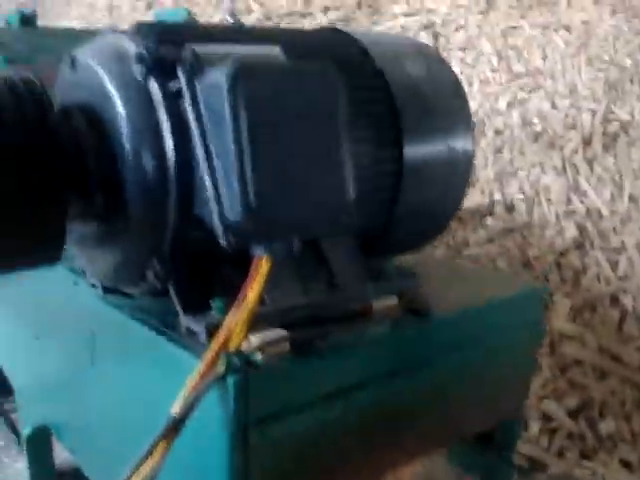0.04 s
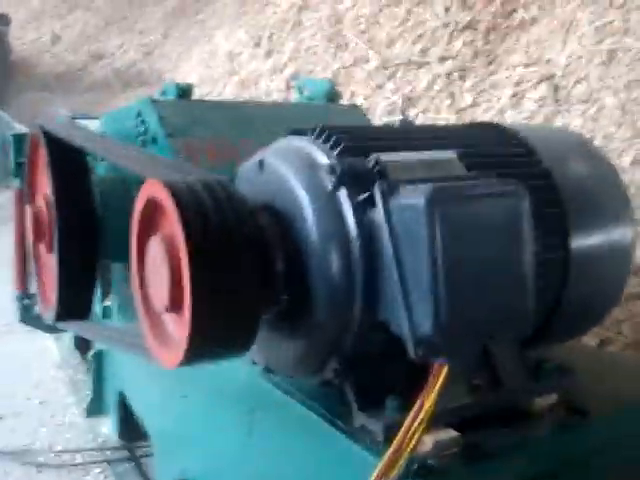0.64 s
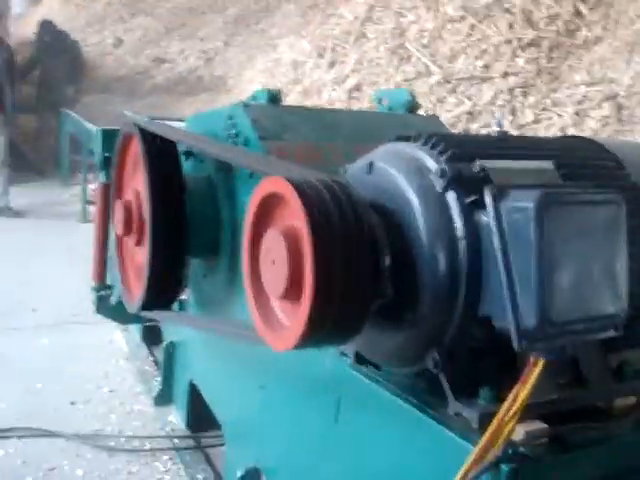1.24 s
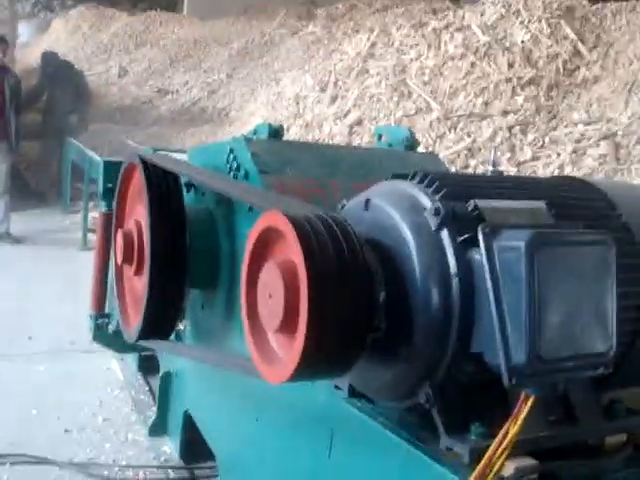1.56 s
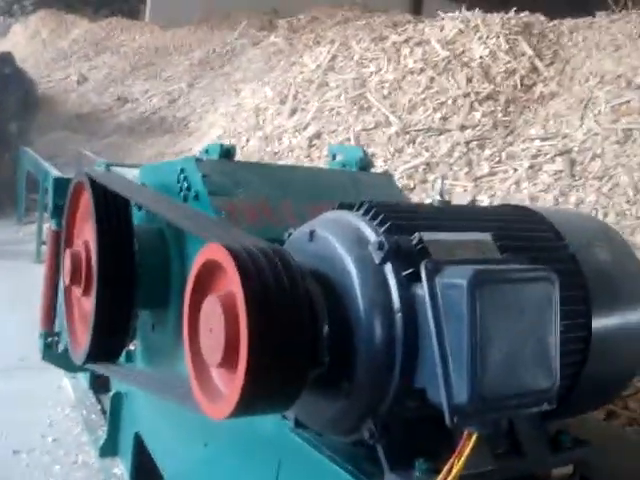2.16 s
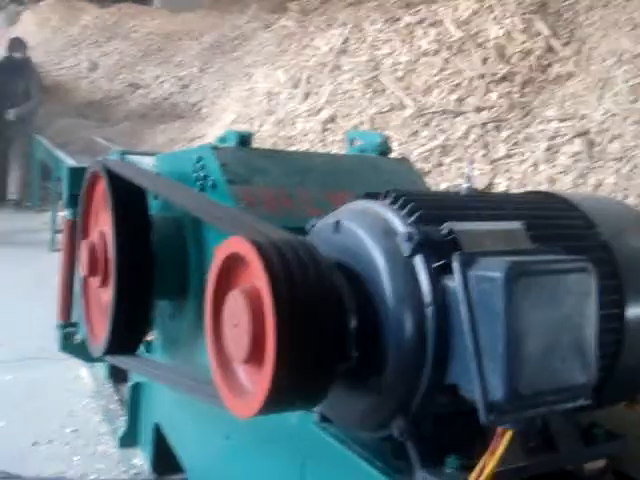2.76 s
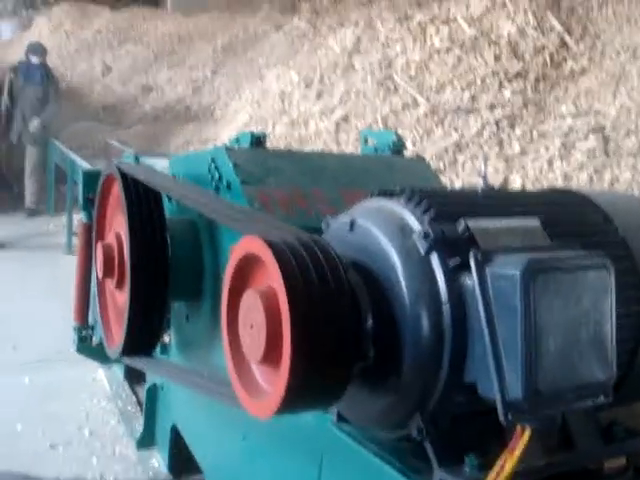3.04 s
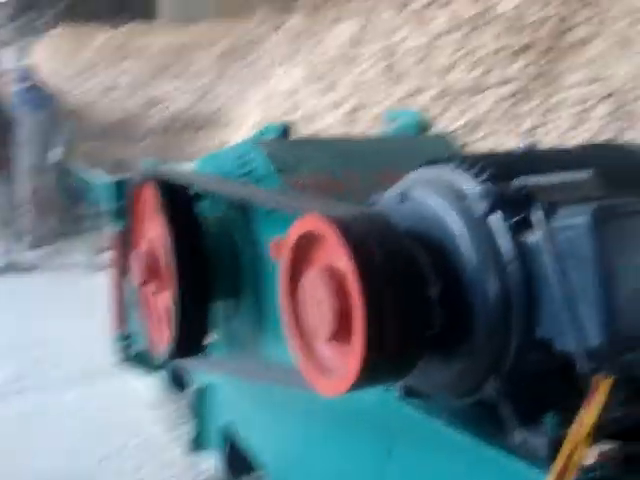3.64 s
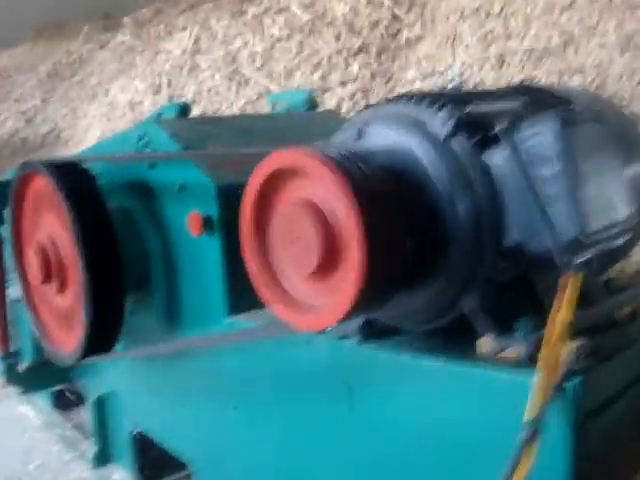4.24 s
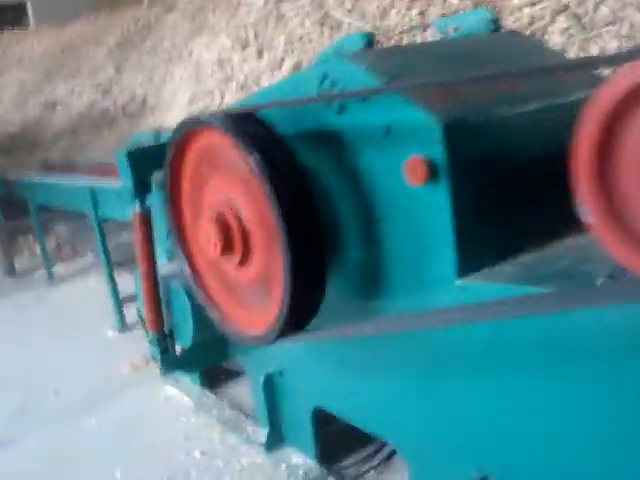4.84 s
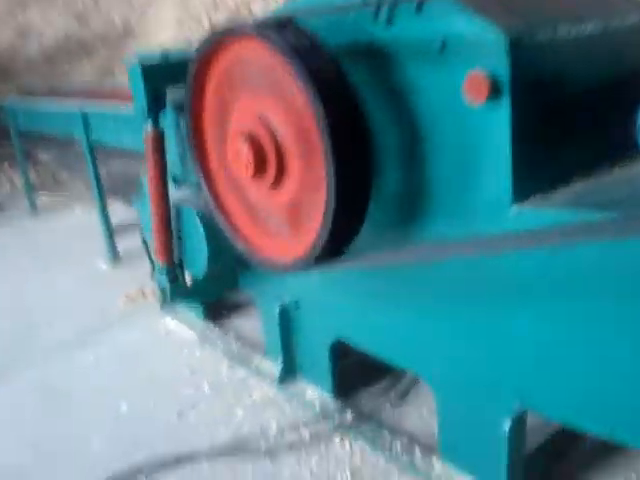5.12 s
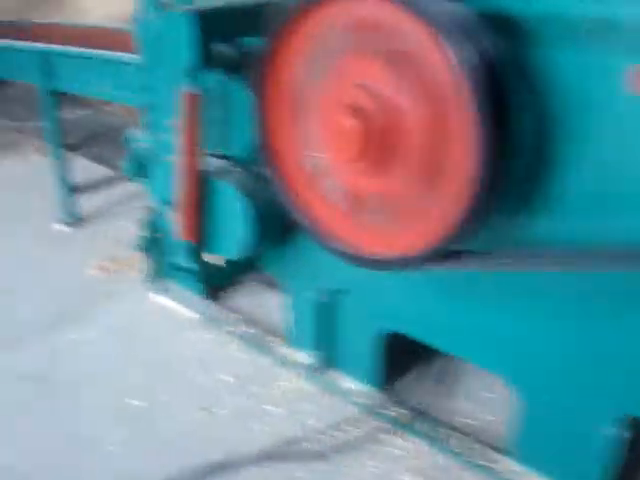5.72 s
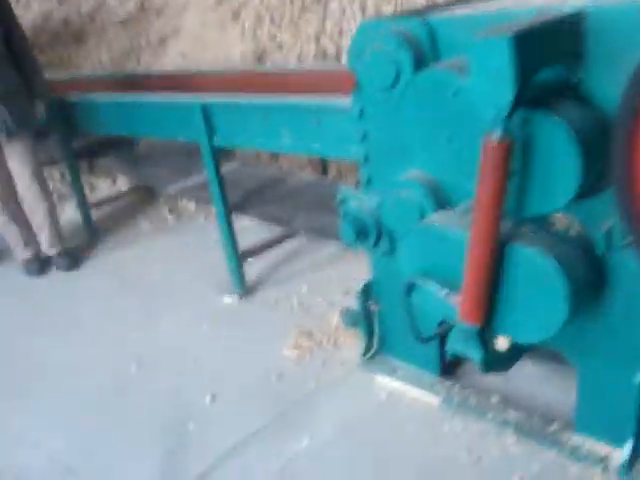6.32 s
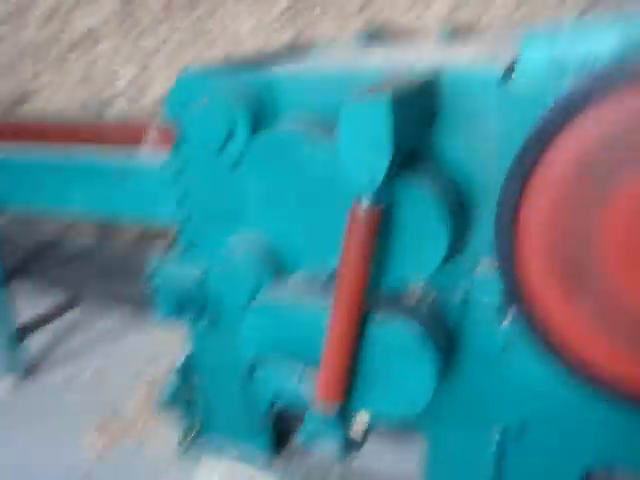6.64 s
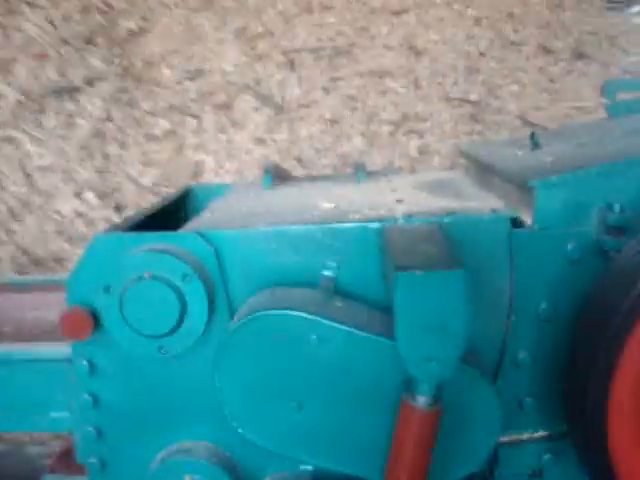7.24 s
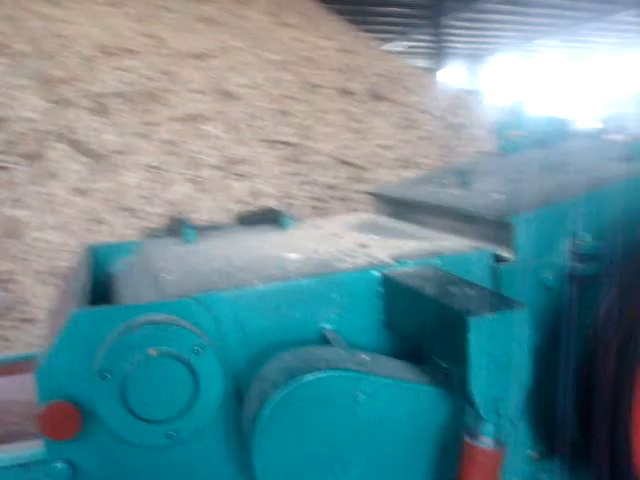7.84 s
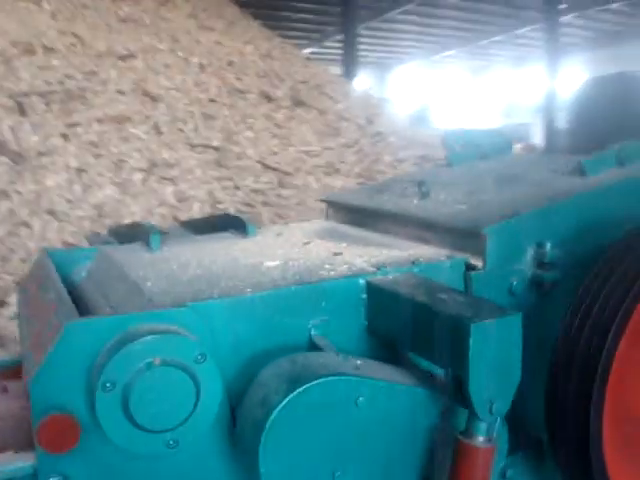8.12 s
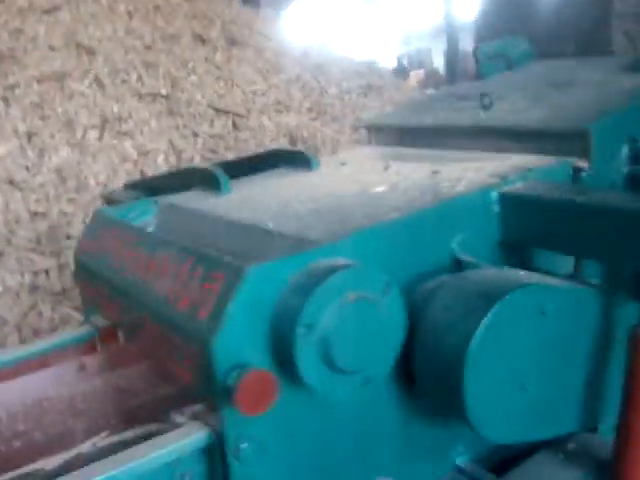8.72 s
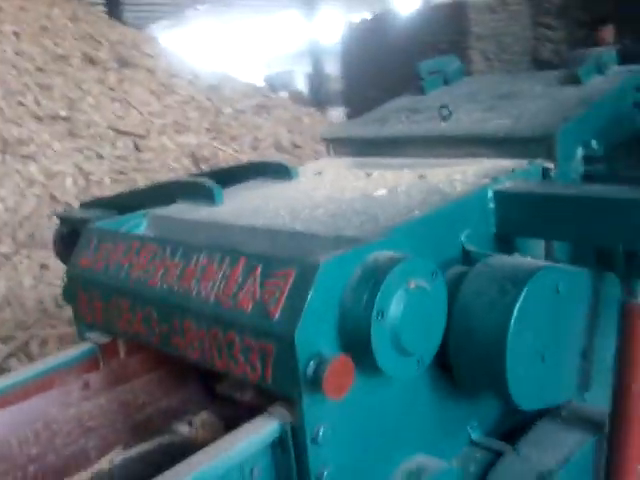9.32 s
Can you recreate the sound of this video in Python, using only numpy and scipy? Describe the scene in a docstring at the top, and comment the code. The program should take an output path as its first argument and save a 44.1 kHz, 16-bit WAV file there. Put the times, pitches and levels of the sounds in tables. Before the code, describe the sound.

A large wood chipper roars steadily, shredding wood over a low drone, a thin motor whine and hissing chips.

```python
"""A belt-driven drum chipper runs in a yard: knives shred wood, chips rattle through the steel housing,
the drum drones on the orders of its knife beat, the belts hiss and tough pieces flare up in the roar.
The listener reaches the whining electric motor by 2 s, then passes the side plate as the housing
gradually hides the flying chips. The feed slackens at 4.6 s, the housing knocks at 5.3 s, and the feed
slackens again at 6.2 s. From 8 s the drone swells in front of the open feed mouth."""
import sys
import numpy as np
from scipy import signal
from scipy.fft import rfft, irfft, next_fast_len
from scipy.io import wavfile
from scipy.ndimage import uniform_filter1d, map_coordinates

SR = 44100
rng = np.random.default_rng(int(sys.argv[2]) if len(sys.argv) > 2 else 0)


def wav_out(sig):
    """Save sig, one row per channel (or a flat mono array), as 16-bit PCM at SR to the path in sys.argv[1]."""
    wavfile.write(sys.argv[1], SR, np.round(np.clip(np.atleast_2d(sig).T, -1, 1) * 32767).astype(np.int16))


N = 422478
TIME_S = np.arange(N) / SR


def amp(db):
    """Decibels to gain."""
    return 10 ** (np.asarray(db) / 20)


def unit(x):
    """Scale to rms 1."""
    return x / np.sqrt(np.mean(x ** 2) + 1e-20)


def curve(rows):
    """(time, value) rows to one value per sample."""
    return np.interp(TIME_S, *np.transpose(rows))


def wobble(knots_per_s):
    """Smooth random curve, rms near 1."""
    coarse = np.arange(0, N + 64, 64)
    knots = rng.standard_normal(2048)
    spline = map_coordinates(knots, [coarse * knots_per_s / SR], mode="wrap")
    return np.interp(np.arange(N), coarse, spline)


def filtered(x, response):
    """Zero-phase filter with gain response(hz)."""
    size = next_fast_len(N + 8192)
    return irfft(rfft(x, size) * response(np.fft.rfftfreq(size, 1 / SR)), size)[:N]


def coloured(x, spectrum):
    """x through (frequency, level) rows, at rms 1."""
    points_hz, db = np.transpose(spectrum)
    return unit(filtered(x, lambda hz: amp(np.interp(np.log(hz + 1), np.log(points_hz), db))))


def resonance(centre_hz, half_width_hz):
    """Narrow noise band at rms 1."""
    noise = rng.standard_normal(N)
    return unit(filtered(noise, lambda hz: 1 / (1 + ((hz - centre_hz) / half_width_hz) ** 2)))


def patchy(x, depth_db):
    """Changing pieces of wood briefly favour changing bands."""
    spectra = signal.stft(x, nperseg=512)[2]
    across_bands = uniform_filter1d(rng.standard_normal(spectra.shape), size=9, axis=0)
    patches = unit(uniform_filter1d(across_bands, size=10, axis=1))
    return signal.istft(spectra * amp(depth_db * patches), nperseg=512)[1][:N]


def impacts(per_s, scatter_db, blur):
    """Hail of tiny uneven impacts; the housing smears the power share blur into noise."""
    clicks = (rng.random(N) < per_s / SR) * rng.choice([-1, 1], N)
    hits = clicks * amp(scatter_db * rng.uniform(-0.57, 1, N))
    return np.sqrt(1 - blur) * unit(hits) + np.sqrt(blur) * rng.standard_normal(N)


def strokes(beats, depth, fall_beats, uneven_db=6, stray_beats=0.12):
    """Envelope: each knife cuts a little early or late, with a burst of its own strength."""
    cuts = np.abs(beats + stray_beats * wobble(30))
    force = amp(uneven_db * (2 * rng.random(1024) - 1))[cuts.astype(int)]
    return unit(1 + depth * force * np.exp(-(cuts % 1) / fall_beats))


# Belt hiss spectrum: (frequency [Hz], relative density [dB])
BELT_SPECTRUM = [(3000, -40), (5500, -11), (7500, -0.5), (9000, 2.5), (10200, -7.5)]


def belts(level_db=-35):
    """Drive belts hiss evenly over their pulleys."""
    return amp(level_db + 0.4 * wobble(9)) * coloured(rng.standard_normal(N), BELT_SPECTRUM)


# Motor whine envelope: (time [s], relative level [dB])
WHINE_LEVELS = [(0, -26.5), (1.2, -31.5), (3, -31.5), (4, -35), (4.7, -41), (5.6, -32), (7, -37),
                (9.58, -32.5)]


def motor_whine(pitch_hz=1636, half_width_hz=20, gain_db=-2.5):
    """The motor sings in one narrow, fuzzy band."""
    return amp(curve(WHINE_LEVELS) + gain_db) * resonance(pitch_hz, half_width_hz)


# Steel housing modes: (frequency [Hz], half width [Hz], relative level [dB])
HOUSING_MODES = [(1065, 22, -4.5), (1132, 17, 1), (1256, 19, 1.5), (1456, 12, 1.5), (1936, 30, 1),
                 (2350, 32, -8), (2474, 77, -7), (3080, 44, -3.5), (3500, 19, -11.5), (4335, 20, 0.5)]


def housing_ring(shred_db, relative_db=-11, uneven_db=2.5):
    """Chips hit the plates here and there; each mode rings up and fades independently."""
    ring = np.zeros(N)
    for mode_hz, half_width_hz, db in HOUSING_MODES:
        ring += resonance(mode_hz, half_width_hz) * amp(db + uneven_db * wobble(6))
    return amp(shred_db + relative_db) * unit(ring)


# Housing knocks: (time [s], decay start level [dB], pitch [Hz], t60 [s])
HOUSING_KNOCKS = [(5.228, -29, 133, .06), (5.273, -19, 243, 0.076), (5.299, -24, 177, .06),
                  (5.322, -29, 130, .06)]


def knocks(attack_s=0.0063):
    """Soft, heavy blows in the housing ring briefly."""
    out = np.zeros(N)
    for start_s, db, pitch_hz, t60_s in HOUSING_KNOCKS:
        age_s = np.maximum(TIME_S - start_s, 0)
        envelope = amp(db - 60 * age_s / t60_s) * (1 - np.exp(-age_s / attack_s))
        out += envelope * np.sin(2 * np.pi * pitch_hz * age_s)
    return out


# Churned air and feed mouth boom spectra: (frequency [Hz], relative density [dB])
AIR_SPECTRUM = [(20, -36.5), (70, -35.5), (110, -29), (160, -21.5), (220, -14), (300, -8), (450, -4.5),
                (700, -2), (1100, -2), (1600, -8.5), (3000, -15), (8000, -52)]
MOUTH_SPECTRUM = [(100, -39), (250, -26), (370, 5), (480, -13), (620, -7), (900, 0), (1400, -17),
                  (4000, -51)]


def air_churn(beats, facing, air_db, mouth_db=-36.5):
    """The drum churns air in puffs; the hollow feed mouth booms only from the front."""
    puffs = rng.standard_normal(N) * strokes(beats, depth=0.77, fall_beats=0.42)
    mouth_puffs = rng.standard_normal(N) * strokes(beats, depth=0.8, fall_beats=0.3)
    boom = amp(mouth_db) * facing * coloured(mouth_puffs, MOUTH_SPECTRUM)
    return amp(air_db) * coloured(puffs, AIR_SPECTRUM) + boom


# Drone at motor, side plate and feed mouth: (beat order, relative level [dB])
MOTOR_ORDERS = [(1, -37), (2, -20.5), (3, -16), (4, -8.5), (5, -5), (6, -4.5), (7, 1), (8, -11.5),
                (9, -3.5), (10, -5), (11, -4.5), (12, 0), (13, -2.5), (14, -7), (15, -1), (16, -2.5),
                (17, -3.5), (18, -2), (19, -2), (20, -7), (21, -6), (22, -12)]
SIDE_ORDERS = [(1, -41.5), (2, -20.5), (3, -14.5), (4, -14.5), (5, 2), (6, -5), (7, -6), (8, -4), (9, -1),
               (10, 0.5), (11, -3.5), (12, 2.5), (13, 2), (14, 0), (15, -11.5), (16, 1.5), (17, 0.5),
               (18, -14), (19, -3.5), (20, 0), (21, -3), (22, 1)]
MOUTH_ORDERS = [(1, -42), (2, -23), (3, -18.5), (4, -12), (5, 3.5), (6, -18), (7, -7.5), (8, -1.5), (9, 5),
                (10, 3), (11, -7), (12, 6), (13, -6), (14, -3), (15, -10), (16, -5.5), (17, -2.5),
                (18, -3.5), (19, -19), (20, 2), (21, -12), (22, -7)]
# Reflection off the concrete floor: (time [s], extra path [m])
FLOOR_DETOUR = [(0, 2.6), (1.2, 2.7), (3.4, 2.57), (4.3, 2.3), (6.3, 2), (7, 2.22), (8.6, 2.25),
                (9.58, 1.87)]


def drum_drone(beats, beat_hz, place, level_db, drift_db=1.3, flutter=0.13, slip_beats=0.0062):
    """Orders of the knife beat, smeared by the load; place and floor reflection set their balance."""
    floor_gain, sound_m_per_s = 0.28, 343
    angle_rad = 2 * np.pi * (beats + slip_beats * wobble(7))
    lag_rad = 2 * np.pi * beat_hz * curve(FLOOR_DETOUR) / sound_m_per_s
    tables = np.array([MOTOR_ORDERS, SIDE_ORDERS, MOUTH_ORDERS])
    gains = amp(tables[:, :, 1])
    gains /= np.linalg.norm(gains, axis=1, keepdims=True)  # equal power at the three places
    tone = np.zeros(N)
    for order, by_place in zip(tables[0, :, 0], gains.T):
        gain = np.interp(place, [0, 1, 2], by_place)
        sway = unit(amp(drift_db * wobble(1.635)) * (1 + flutter * wobble(22)))
        phase = order * angle_rad + rng.uniform(0, 2 * np.pi)
        tone += gain * sway * (np.sin(phase) + floor_gain * np.sin(phase - order * lag_rad))
    return np.sqrt(2) * amp(level_db) * tone


# Flying chip spectrum: (frequency [Hz], relative density [dB])
SPRAY_SPECTRUM = [(1000, -34), (3000, -19), (4500, 2), (5800, 3), (7500, -0.5), (9000, -3.5), (10200, -9.5)]


def chip_spray(beats, level_db):
    """Each cut flings chips against the steel in uneven showers."""
    chips = impacts(per_s=3000, scatter_db=10.5, blur=0.57) * strokes(beats, depth=0.37, fall_beats=0.53)
    return amp(level_db + 0.55 * wobble(14)) * coloured(patchy(chips, depth_db=1.08), SPRAY_SPECTRUM)


# Tough pieces: (centre time [s], level [dB], pitch [Hz], half width [octaves], length [s])
TOUGH_PIECES = [(0.05, -19, 1570, .3, .03), (.31, -23, 1550, .45, .07), (0.553, -21, 1450, .36, .05),
                (1.336, -21, 3200, .35, 0.048), (1.44, -21.5, 2400, .25, .06), (2.033, -24, 3100, .15, .05),
                (2.6, -23.5, 4200, .3, .05), (2.954, -20, 2800, 0.63, 0.075),
                (5.95, -22, 3200, 0.54, 0.042), (6.36, -18, 2300, .2, .012),
                (6.402, -22, 2480, 0.31, 0.064), (6.683, -24, 3500, 0.65, .03), (7, -19, 2700, 0.63, 0.069),
                (7.305, -20, 2900, .55, 0.026), (7.82, -23, 2690, 0.46, .055), (7.944, -21, 3300, .5, .04),
                (8.668, -22.5, 2400, 0.49, .025), (9.068, -23, 3200, 0.99, .035),
                (9.337, -22, 2800, .57, 0.022)]


def bites(beats):
    """A tough piece crunches briefly under the knives, in a band of its own."""
    crunch = impacts(per_s=810, scatter_db=4, blur=0.64) * strokes(beats, depth=0.25, fall_beats=0.33)
    out = np.zeros(N)
    for centre_s, db, pitch_hz, half_oct, length_s in TOUGH_PIECES:
        band = filtered(crunch, lambda hz: (1 + (np.log2((hz + 1) / pitch_hz) / half_oct) ** 4) ** -0.5)
        flare = np.exp(-2 * ((TIME_S - centre_s) / length_s) ** 2)
        out += amp(db) * unit(band) * flare
    return out


# Shredding spectrum: (frequency [Hz], relative density [dB])
SHRED_SPECTRUM = [(200, -52.5), (600, -16), (1000, -2.5), (1400, -1), (1850, -0.5), (2300, 0), (3000, 0.5),
                  (4000, -2), (5500, -10.5), (10000, -35.5)]


def shredding(beats, level_db):
    """Fibres snap under the knives."""
    snaps = impacts(per_s=4000, scatter_db=5.5, blur=0.62) * strokes(beats, depth=0.22, fall_beats=0.43)
    return amp(level_db + 0.52 * wobble(24)) * coloured(patchy(snaps, depth_db=0.59), SHRED_SPECTRUM)


# Slack feed: (centre time [s], load dip [dB])
FEED_LULLS = [(4.55, 1.3), (6.21, 3)]


def feed_load_db(uneven_db=0.19, half_length_s=0.1):
    """The load wavers, and sinks while little wood reaches the knives."""
    dips_db = sum(db * np.exp(-((TIME_S - s) / half_length_s) ** 2) for s, db in FEED_LULLS)
    return uneven_db * wobble(6) - dips_db


# Knife beat: (time [s], rate [Hz])
KNIFE_BEAT = [(0, 45.9), (1.5, 45.95), (4, 46.0), (7, 46.03), (9.58, 46.06)]
# Listener's path: (time [s], place [0 motor, 1 side plate, 2 and up feed mouth])
LISTENER_PATH = [(0, 1.1), (.6, 0.74), (1.8, 0), (4.8, 0.17), (5.35, 1.23), (7.9, 0.82), (8.45, 1.8),
                 (9.58, 2.4)]
# Housing's cover of the chip outlet: (time [s], hidden share [0-1])
OUTLET_HIDDEN = [(0, 0.1), (.5, 0), (1.8, 0.29), (3.5, 0.39), (4.3, 0.48), (7.2, 0.69), (8.9, 1),
                 (9.58, 0.83)]


def scene():
    """One knife beat drives drum and wood; the walk sets their balance. Mono on both channels."""
    beat_hz, place, hidden = curve(KNIFE_BEAT), curve(LISTENER_PATH), curve(OUTLET_HIDDEN)
    beats = np.cumsum(beat_hz) / SR
    facing = np.clip(place - 1, 0, 1)  # 1 in front of the mouth
    load_db = feed_load_db()
    air_db = -26 + facing + load_db
    drone_db = -30 + 6.2 * facing + load_db
    spray_db = -25.5 - 4.5 * hidden ** 5.9 + 0.3 * load_db  # shadow sets in late and steeply
    shred_db = -19 - 4 * hidden + 0.5 * load_db
    drum = drum_drone(beats, beat_hz, place, drone_db) + air_churn(beats, facing, air_db)
    wood = shredding(beats, shred_db) + chip_spray(beats, spray_db) + bites(beats)
    housing = knocks() + housing_ring(shred_db)
    return np.array([drum + wood + housing + motor_whine() + belts()] * 2)


def record(dry, ceiling=0.7, cutoff_hz=10150):
    """Soft peak limiter, then a steep low-pass."""
    rounded = dry / (1 + (dry / ceiling) ** 6) ** (1 / 6)
    return np.array([filtered(ch, lambda hz: (1 + (hz / cutoff_hz) ** 500) ** -0.5) for ch in rounded])


dry = scene()
out = record(dry)
wav_out(out)
```